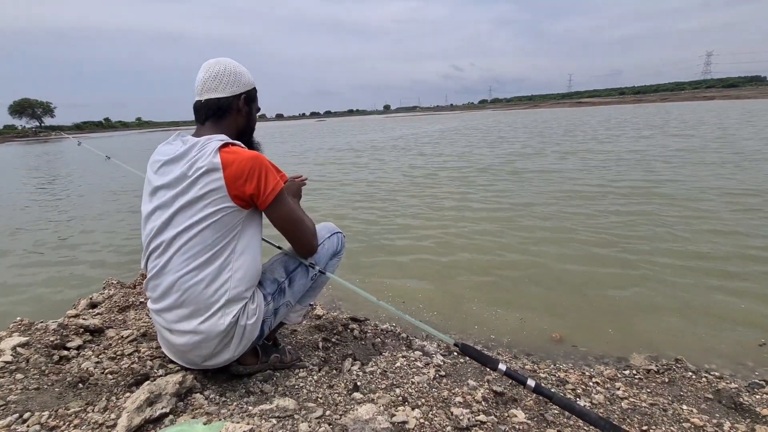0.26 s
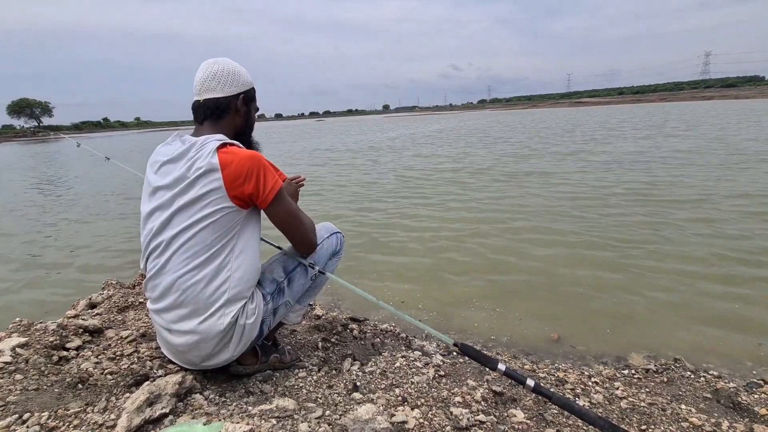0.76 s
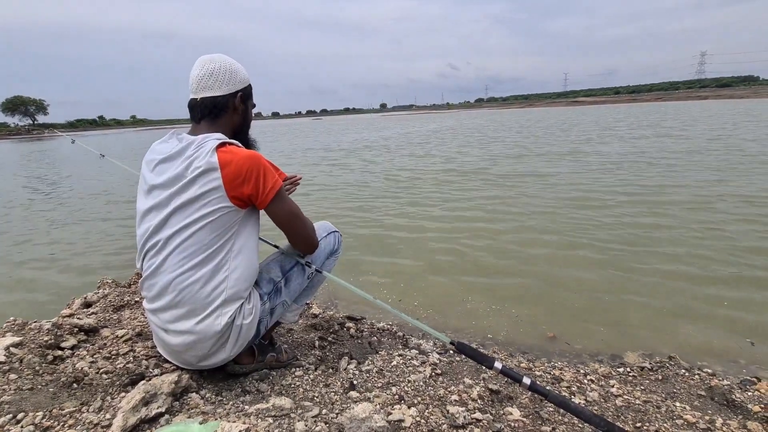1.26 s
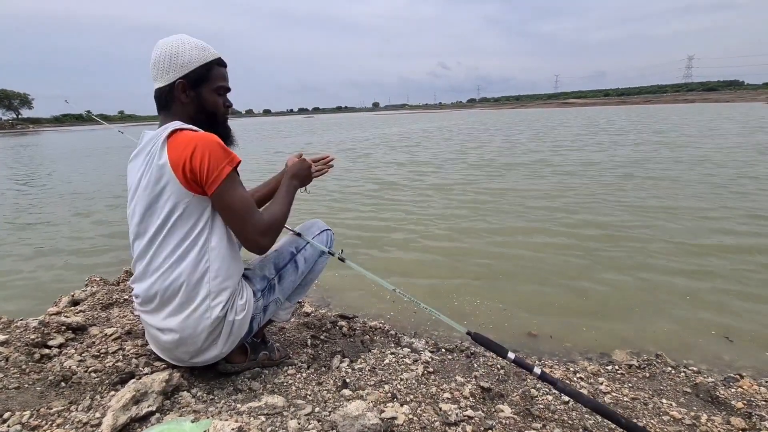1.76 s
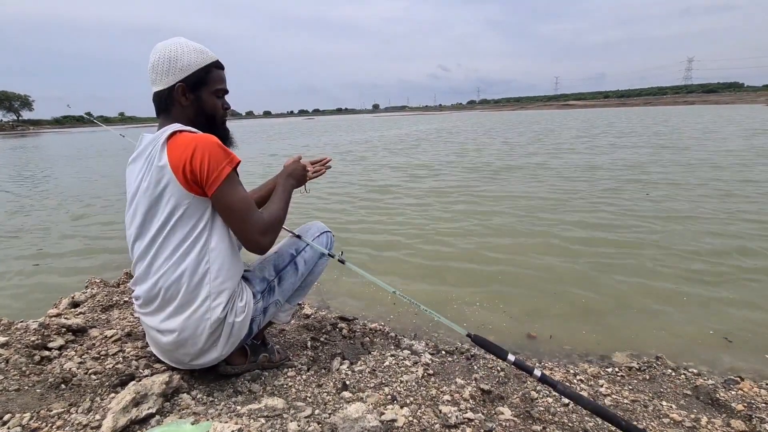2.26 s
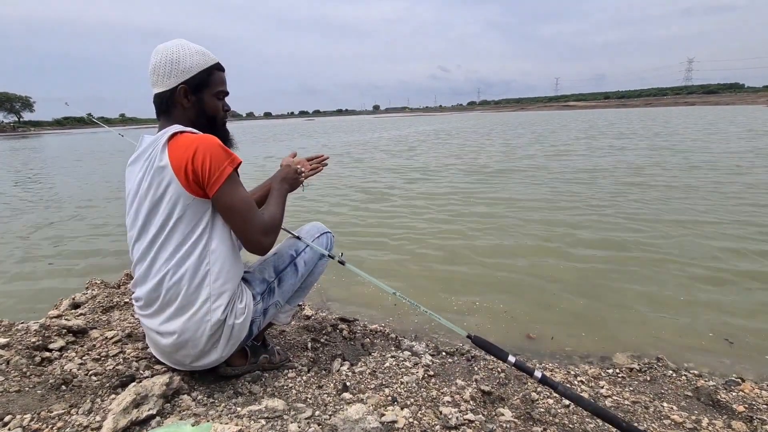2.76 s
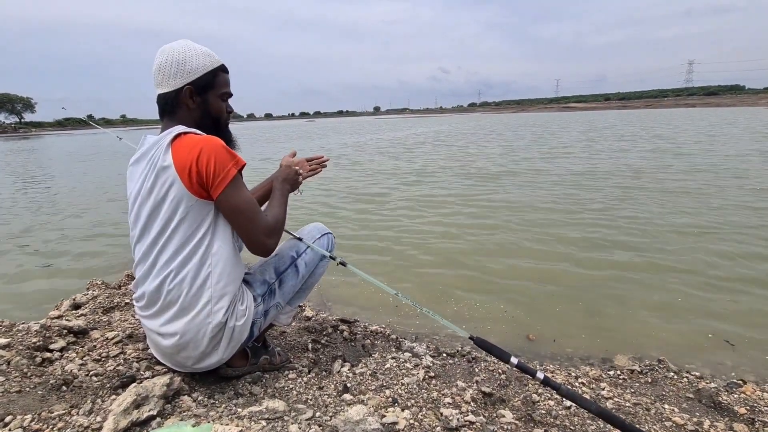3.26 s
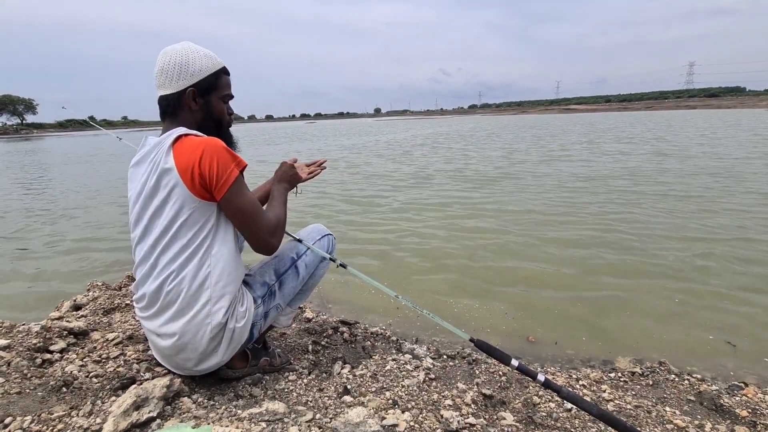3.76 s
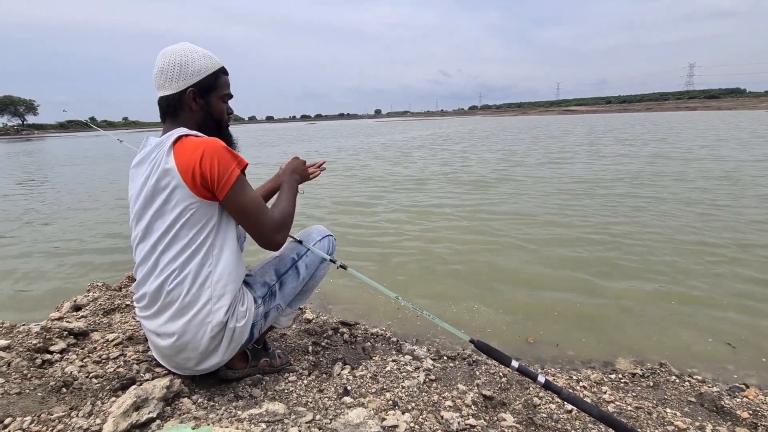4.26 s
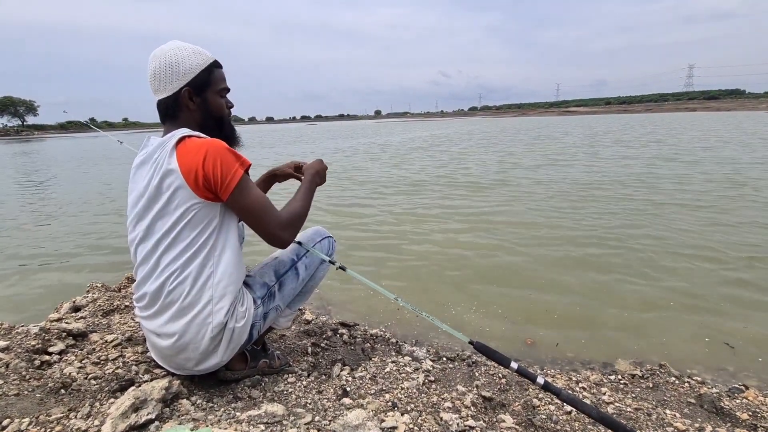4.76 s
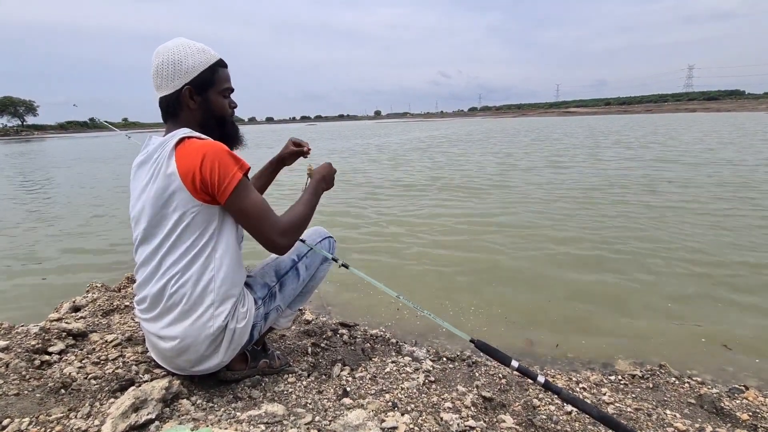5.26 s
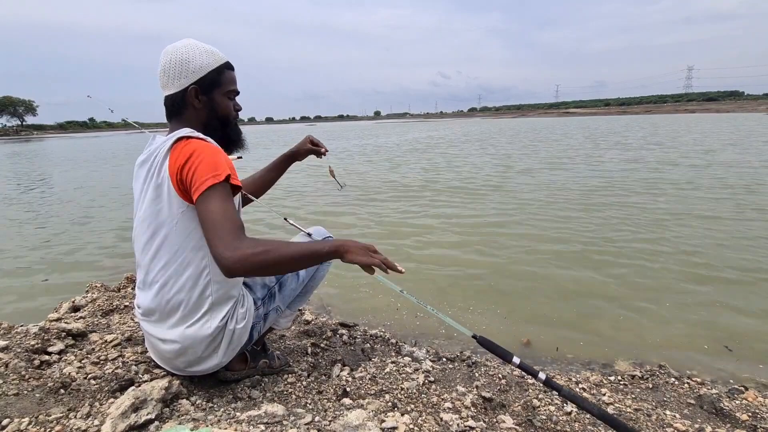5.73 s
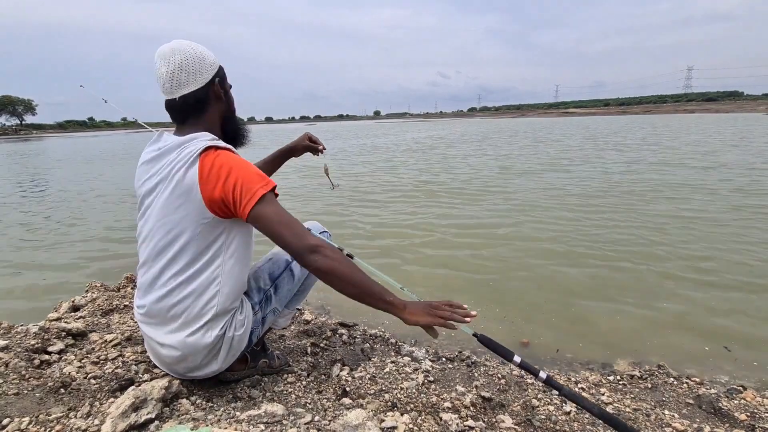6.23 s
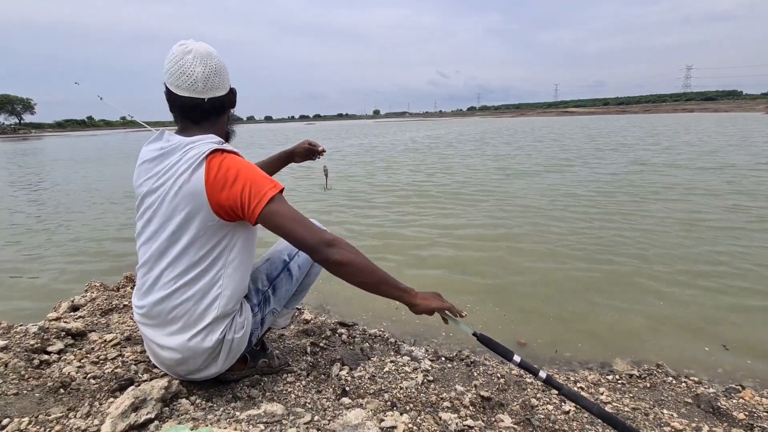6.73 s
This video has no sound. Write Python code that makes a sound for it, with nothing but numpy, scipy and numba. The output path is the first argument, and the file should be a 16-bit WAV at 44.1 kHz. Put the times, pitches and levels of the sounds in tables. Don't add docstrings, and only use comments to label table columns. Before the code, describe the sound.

Breezy waterside ambience with faint ticks and rustling hands, then a nearby crow caws three times, pauses, and caws three times more.

```python
import sys
import numpy as np
from scipy import signal
from scipy.fft import rfft, irfft, next_fast_len
from scipy.io import wavfile
from scipy.ndimage import uniform_filter1d
from numba import njit

SR = 44100
rng = np.random.default_rng(int(sys.argv[2]) if len(sys.argv) > 2 else 0)


def elevation(decibels):
    levels = np.asarray(decibels, float)
    return 10 ** (levels / 20)


def digitize_waveform(pressure):
    field = np.atleast_2d(pressure).T
    bounded = np.clip(field, -1, 1)
    quanta = np.round(bounded * 32767).astype(np.int16)
    wavfile.write(sys.argv[1], SR, quanta)


N = 308406

# (centre [s], length [s], rise [dB], shift of left minus right [dB])
GUSTS = [(0.088, 0.081, 6.5, -2), (0.243, 0.23, -4, -9), (0.477, 0.42, 1, 1), (1.594, 0.29, -5.5, -12),
         (1.85, 0.48, 3.5, 0.5), (2.347, 0.43, 7, -8.5), (2.594, 0.34, 10, 1.5), (2.805, 0.26, 13.5, -14.5),
         (3.07, 0.27, -4.5, 3), (3.647, 0.51, -5.5, -4), (3.922, 0.36, -4, -12), (4.255, 0.17, 5.5, -4),
         (4.778, 0.11, -5, -8), (.9, .2, 3, 3), (1.196, 0.14, 6, 2), (5.403, 0.13, 3, 0),
         (6.3, 0.38, 0.5, 1), (6.868, 0.27, 2, -3), (4.926, 0.22, 14, -11), (5.2, .12, -5, 0),
         (5.36, .15, -4, 0), (2.44, .15, 3, 0), (3.05, .12, 4, 0), (5.078, 0.2, 7.5, 0.5),
         (5.526, 0.77, 5.5, 2.5), (6.678, 0.049, -6, -4)]
# (frequency [Hz], density [dB per Hz])
RUMBLE_SPECTRUM = [(8.8, -45), (15, -6.5), (43, 3.5), (70, 5), (87, 1.5), (171, -18), (295, -32.5),
                   (373, -37), (500, -61), (650, -65), (1100, -120)]
# (frequency [Hz], density [dB per Hz])
AIR_SPECTRUM = [(210, -11), (350, -3), (400, -8), (800, -9.5), (1280, -8.5), (2290, -10.5), (4170, -13.5),
                (5280, -16.5), (7000, -22.5), (8700, -31), (10500, -25), (13000, -25), (15200, -29.5),
                (15650, -29)]
# (frequency [Hz], width [Hz], level [dB])
PUMP_BANDS = [(144, 80, -62.5), (240, 84, -68), (294.1, 34, -68.5), (572.4, 40, -77.5)]
# (start [s], length [s], grain level [dB])
HANDLING = [
    (.28, 1.4, -58.5),
    (1.85, 0.81, -47.5),
    (2.598, 1.1, -59),
    (5.5, 1.7, -52.5),
]
# (time [s], peak [dB], ring [Hz], ring width [Hz])
TICKS = [(0.12, -58, 2500, 2500), (0.1753, -61, 8600, 9700), (0.286, -59, 8000, 8000),
         (0.34, -50, 3000, 2500), (0.358, -62, 7400, 3000), (.4, -59, 6700, 3000), (0.45, -54, 3700, 2000),
         (0.475, -56, 5700, 9000), (0.6056, -43, 3700, 5400), (0.56, -53.5, 10300, 3950),
         (0.868, -44, 5900, 3500), (0.867, -60, 11000, 5000), (1.0677, -60, 6200, 1500),
         (1.0726, -72, 6000, 8000), (1.21, -52, 3000, 2000), (1.858, -45, 1300, 3500),
         (1.876, -51, 2900, 2000), (2.3151, -45.5, 3200, 1800), (2.3883, -43, 2800, 3500),
         (3.5, -67, 10600, 1985), (4.868, -53, 2700, 2700), (5.1413, -51, 3100, 2000),
         (5.257, -66, 10000, 6000), (5.9394, -59, 6200, 2993), (6.625, -54, 4300, 2000),
         (6.597, -62, 6400, 2500), (6.608, -60, 7000, 2500), (6.042, -60, 5500, 2500),
         (6.155, -61, 7800, 2500), (6.291, -65, 7500, 3500), (6.079, -56, 3800, 1200),
         (4.7, -56, 3100, 900), (6.4, -56, 3100, 900), (1.145, -59, 6500, 3000), (1.074, -57, 5300, 1500),
         (7.2, -55, 2700, 1500), (4.4, -57.5, 3850, 1000), (6.563, -61, 4400, 2000),
         (6.6533, -64, 10000, 7870), (6.666, -51, 8200, 14000)]
# (start [s], length [ms], level [dB])
SWISHES = [(.28, 120, -63), (.84, 58, -58), (1.05, 126, -69), (1.86, 210, -61), (2.24, 140, -62),
           (4.2, 81, -69), (5.42, 46, -67), (6.64, 40, -68)]
# (start [s], peak [dB], pitch [Hz],
# length [ms], glide [factor])
PEEPS = [(0.431, -57, 3560, 98, 1.24), (.512, -54, 7180, 26, 0.92), (0.53, -61, 5850, 74, 0.91),
         (.57, -57, 5000, 57, 0.68), (.755, -62, 4220, 32, 0.94), (1.225, -56, 3350, 35, 0.95),
         (1.31, -55.5, 4200, 18, 0.96), (1.34, -62, 5580, 32, 0.88), (1.872, -50, 4050, 30, 0.96),
         (2.955, -55.5, 4010, 81, 1.1), (3.005, -54.5, 4350, 50, 1.08), (3.335, -46.5, 5230, 36, 0.96),
         (3.05, -51, 5300, 32, 1.08), (2.765, -59, 3750, 22, 0.94), (3.775, -56, 3750, 18, 1.1),
         (3.39, -62.5, 5870, 78, 1), (3.439, -52, 4530, 31, 0.72), (3.615, -54.5, 3800, 47, 1.12),
         (3.65, -55, 4400, 39, 1), (3.69, -58, 7300, 30, 0.84), (3.72, -61, 5480, 63, 1.03),
         (3.76, -56, 4450, 24, 0.9), (5.716, -47, 4170, 12, .9), (5.872, -50, 4150, 14, .93),
         (5.89, -58, 4200, 52, 1), (5.46, -55, 4200, 14, 0.9)]
# (time [s], peak [dB])
TRILL = [(2.818, -50), (2.882, -48), (2.936, -51.5), (3.009, -41), (3.139, -43), (3.204, -42.5),
         (3.293, -46), (3.376, -49), (3.724, -57), (4.0906, -55), (4.445, -58)]
# (low turn [s], peak [dB], high start [dB], held note [Hz], its slope [Hz])
WHISTLES = [(0.841, -45.5, -7, 4205, -37), (0.977, -45, -8.5, 4260, -180), (1.122, -44, -8, 4210, -55),
            (1.909, -45.5, -21, 4264, -57), (2.048, -44, -4, 4250, -11), (2.1957, -43.5, -2.5, 4154, 5),
            (2.358, -46, -2.5, 4237, -14), (5.4012, -44, -8, 4250, 49), (5.533, -43.5, -5.5, 4300, 40),
            (5.672, -47, -2.5, 4230, -26), (5.825, -47.5, -7.5, 4180, 310)]
# (time from the onset of its low turn [ms], pitch [Hz], level [dB])
PLUNGE = [(-32, 6950, -30), (-25, 6800, -8), (-14, 6680, -6), (-11, 5500, -8), (-8, 4600, -5),
          (-3, 4130, -3), (7, 3640, -3), (9, 3600, -30), (10, 4600, -10)]
# (time [s], peak [dB], pitch [Hz], length [ms])
DRIPS = [(1.222, -52, 4720, 9), (1.834, -46, 3850, 5.9), (2.76, -49.5, 5390, 13), (3.444, -47, 1470, 15),
         (3.462, -48, 1433, 18), (3.807, -55, 410, 21), (4.015, -45.5, 3680, 4.7), (4.268, -58, 387, 16),
         (4.68, -50, 3680, 3.6), (5.191, -44, 3720, 11), (5.248, -51.5, 3920, 6.4), (5.635, -51, 600, 22),
         (6.372, -53, 630, 30), (6.52, -57, 3320, 15), (6.599, -47, 3280, 6.2)]
# (time [s], peak [dB], pitch [Hz], length [ms], glide [factor])
RISING_DRIP = (4.612, -56, 1330, 30, 1.7)
# (time [s], peak [dB], second chip after [ms])
CHIP_PAIRS = [(1.8064, -52.5, 21), (2.082, -52.5, 21), (2.841, -53.5, 19), (3.2853, -55, 18),
              (3.989, -53.5, 19), (4.651, -54, 18), (5.221, -53, 17), (6.051, -57, 19), (6.752, -43, 18)]
# (start [s], end [s])
CAWS = [
    (1.855, 2.128),
    (2.325, 2.805),
    (3.038, 3.34),
    (5.445, 5.89),
    (6.105, 6.49),
    (6.709, 6.99),
]
# (time [s], effort [dB], beak opening as brightness [dB], shrillness [dB])
EFFORT = [
    [(1.858, -44, 1, -5), (1.93, -44, 5, -10), (2.0, -42.5, 12.5, -16), (2.035, -43.5, 15.5, -12),
     (2.06, -43.5, 15, 6), (2.08, -43.5, 12.5, -8), (2.107, -46.5, 12, -8)],
    [(2.345, -54, -2, 0), (2.383, -44.5, 1, -11), (2.5, -41, 8, -5), (2.633, -42.5, 8.5, 7),
     (2.71, -44.5, 12, 4), (2.755, -50, 11.5, -3), (2.785, -56.5, 11, -3)],
    [(3.041, -57.5, 10, -9), (3.06, -48, 7.5, -2), (3.09, -42, 9, 2.5), (3.16, -38.5, 11.5, -12),
     (3.21, -40, 17.5, 5.5), (3.26, -42, 18.5, 5), (3.318, -45, 13.5, -6)],
    [(5.465, -61.5, -15, -4), (5.495, -54.5, -14, -4), (5.52, -45, -4, 1), (5.62, -40.5, 7.5, -6),
     (5.713, -45.5, 6, 8), (5.785, -45, -6.5, 15), (5.839, -45, 9.5, 12), (5.865, -54.5, 9, 6)],
    [(6.112, -55, -1, -12), (6.135, -48.5, 1, -10), (6.187, -42.5, 6.5, -7), (6.24, -46, -2, 11),
     (6.3, -47.5, -3, 17), (6.4, -47, -4, 18), (6.449, -45.5, -3, 10), (6.472, -53.5, 2, 4)],
    [(6.713, -57, 2, -10), (6.728, -52, 1, -4), (6.74, -44, 3.5, 0), (6.78, -42, 5, -11),
     (6.87, -45, -1, -5), (6.957, -47, -9, 6)],
]
# (time [s], pitch [Hz], rattle [0-1], every-second-pulse weakening [0-1])
VOICE = [
    [(1.855, 500, 1, 0), (1.93, 570, .9, 0), (1.99, 585, .65, 0), (2.02, 580, .5, 0), (2.05, 560, .25, .15),
     (2.075, 540, .2, .4), (2.105, 470, .4, .4), (2.112, 460, 1, .2), (2.13, 450, 1, .3)],
    [(2.325, 520, 1, 0), (2.4, 580, .9, 0), (2.52, 618, .8, 0), (2.6, 615, .75, 0), (2.68, 570, .6, 0),
     (2.7, 535, .25, .2), (2.72, 515, .2, .4), (2.75, 420, .4, .5), (2.76, 430, 1, .3), (2.81, 430, 1, .3)],
    [(3.03, 560, 1, 0), (3.1, 600, .95, 0), (3.15, 635, .8, 0), (3.195, 648, .35, 0), (3.228, 603, .15, 0),
     (3.26, 612, .2, .15), (3.285, 625, .25, .5), (3.318, 490, .45, .2), (3.34, 520, 1, .2)],
    [(5.445, 480, 1, 0), (5.52, 580, .9, 0), (5.6, 600, .7, 0), (5.725, 570, .65, 0), (5.74, 525, .15, 0),
     (5.78, 478, .1, .15), (5.835, 468, .1, 0), (5.86, 390, .35, 0), (5.89, 340, 1, 0)],
    [(6.105, 540, 1, 0), (6.19, 600, .8, 0), (6.27, 525, .78, .15), (6.4, 500, .7, .2),
     (6.42, 485, .25, .25), (6.448, 435, .35, .25), (6.46, 450, 1, 0), (6.49, 450, 1, 0)],
    [(6.705, 540, 1, 0), (6.78, 585, .85, 0), (6.86, 520, .85, 0), (6.93, 445, .8, .1), (6.99, 350, .9, 0)],
]
# (low [Hz], main [Hz], upper [Hz], top [Hz])
THROAT_HZ = (1057, 1367, 1739, 2750)
# (start [s], length [s], peak [dB], top band over it [dB])
FAR_CROW = [
    (4.047, 0.61, -56, -3),
    (4.854, 0.48, -58.5, -8),
]
# (frequency [Hz], gain [dB])
SHADE = [(100, 4.5), (700, 4.5), (1250, -10), (1800, -1.5), (2400, -11.5), (4200, -14.5), (6700, -3),
         (8100, -6.5), (15000, -30)]
# (frequency [Hz], lead [samples])
LEAD = [(500, 11.3), (1380, 19), (1640, 20.3), (16000, 25.66)]


def level(x, db):
    return x * elevation(db) / np.sqrt(np.mean(x ** 2))


def curves(*tables):
    t, rows = np.arange(N) / SR, np.vstack(tables)
    gate = sum((t >= table[0][0]) * (t <= table[-1][0]) for table in tables)
    tracks = [np.interp(t, rows[:, 0], column) for column in rows.T[1:]]
    return tracks, uniform_filter1d(1. * gate, size=120)


def colour(x, points):
    hz, db = np.transpose(points)
    size = next_fast_len(N)
    f = np.fft.rfftfreq(size, 1 / SR) + 1
    gain = elevation(np.interp(np.log(f), np.log(hz), db))
    return irfft(rfft(x, size) * gain, size)[..., :N]


@njit
def svf(x, hz, width):
    y, b, l, g, k = np.empty(len(x)), 0., 0., 0., 0.
    for i in range(len(x)):
        if i == 0 or hz[i] != hz[i - 1]:
            g, k = np.tan(np.pi * hz[i] / SR), width / hz[i]
        v = (b + g * (x[i] - l)) / (1 + g * (g + k))
        b, l, y[i] = 2 * v - b, l + 2 * g * v, k * v
    return y


def band(x, hz, width):
    hz = hz + np.zeros(N)
    y = svf(svf(x, hz, 1. * width), hz, 1. * width)
    return y / np.sqrt(uniform_filter1d(y ** 2, size=1800) + 1e-12)


def walk(rate):
    k = int(SR / rate)
    held = np.repeat(rng.standard_normal(N // k + 1), k)
    return 1.3 * uniform_filter1d(uniform_filter1d(held, k), k)[:N]


def add(out, s, piece):
    start = int(s * SR)
    out[start:start + len(piece)] += piece[:N - start]


def peep(hz0, hz1, ms):
    u = np.linspace(0, 1, int(ms * SR / 1000))
    return np.sin(np.pi * u) * np.sin(2 * np.pi * np.cumsum(hz0 + (hz1 - hz0) * u) / SR)


def gusts():
    db, pan_db = np.zeros((2, N))
    for s, long, peak_db, swing_db in GUSTS:
        arch = np.hanning(int(long * SR))
        add(db, max(s - long / 2, 0), peak_db * arch)
        add(pan_db, max(s - long / 2, 0), swing_db * arch)
    return db, pan_db


def wind():
    breeze_db, breeze_pan_db, buffet_db = -47.5, 8.5, 1.23
    gust_db, swing_db = gusts()
    pan_db = swing_db + breeze_pan_db
    rumble = colour(rng.standard_normal((2, N)), RUMBLE_SPECTRUM + [(900, -78.0)])
    rumble = rumble / np.sqrt(uniform_filter1d(rumble ** 2, size=12000))
    loud_db = gust_db + breeze_db + 2.5 + buffet_db * walk(10)
    return rumble * elevation(loud_db + np.array([pan_db, -pan_db]) / 2)


def distant_hiss():
    hiss = np.zeros((2, N))
    for hz in 250 * 2. ** np.arange(7):
        drift_db = 1.36 * walk(12) + 0.45 * walk(1.9)
        ports = [svf(noise, hz + np.zeros(N), hz) for noise in rng.standard_normal((2, N))]
        hiss += elevation(drift_db) * np.array(ports)
    hiss = level(colour(hiss, [(20, -65)] + AIR_SPECTRUM + [(15780, -120)]), -62.0)
    cawing = curves(*([(s, 0), (end, 0)] for s, end, *_ in CAWS))[1]
    lift_db = 0.054 * gusts()[0] + 4 * uniform_filter1d(cawing, size=9000)
    return hiss * elevation(lift_db + np.array([[-1.5], [1.5]]))


def pump():
    light_db, loaded_s = -1.5, 1.5
    lightness = np.clip(1.3 - 1.2 * (np.arange(N) / SR / loaded_s) ** 3, 0, 1)
    drone = np.zeros(N)
    for hz, width, db in PUMP_BANDS:
        drone += elevation(db + 3.1 * walk(12)) * band(rng.standard_normal(N), hz, width)
    return elevation(0.37 * gusts()[0] + light_db * lightness) * drone


def rustle(count=3500):
    out, busy = np.zeros(N), np.full(N, elevation(-81))
    for s, long, db in HANDLING:
        add(busy, s, elevation(db) * np.hanning(int(long * SR)) ** 0.31)
    for when, pitch, size, length in rng.random((count, 4)):
        hz = 1800 * 5 ** pitch ** 1.5
        grain_db = -6 - 2.2 * np.log(size) - 9 * pitch
        grain = peep(hz, 0.67 * hz, 0.73 + 3 * length ** 3)
        add(out, when * N / SR, busy[int(when * N)] * elevation(grain_db) * grain)
    return out


def ticks():
    out, t = np.zeros(N), np.arange(400) / SR
    for s, db, hz, width in TICKS:
        ring_hz = hz + 0. * t
        snap = rng.standard_normal(400) * np.exp(-t / 0.0028)
        snap = svf(svf(snap, ring_hz, 1. * width), ring_hz, 0.49 * width)
        add(out, s, elevation(db + 8.5) * snap / np.abs(snap).max())
    return out


def swishes():
    out, cloth = np.zeros(N), band(rng.standard_normal(N), 4500, 14000)
    for s, ms, db in SWISHES:
        add(out, s, elevation(db) * np.hanning(int(ms * SR / 1000)) ** .5)
    return out * cloth * elevation(2.3 * walk(79))


def far_birds():
    out = np.zeros(N)
    for s, db, hz, ms, glide in PEEPS:
        add(out, s, elevation(db) * peep(hz, hz * glide, ms))
    for s, db in TRILL:
        add(out, s - .002, elevation(db - 5.5) * peep(6700, 4630, 21))
    return out * (.5 + .8 * walk(450))


def songbird():
    held_ms, held_db = (13.9, 28.6, 48.2, 49), (-4.5, -1.5, -2, -25)
    arch_hz, droop_hz = 90, 60
    echo_ms, echo_db = 7, -10
    out, (ms, hz, db) = np.zeros(N), np.transpose(PLUNGE)
    ms, db = np.r_[ms, held_ms], np.r_[db, held_db]
    t = np.arange(ms[0], ms[-1], 1000 / SR)
    for s, peak_db, start_db, held_hz, slope_hz in WHISTLES:
        begin = held_hz - arch_hz - slope_hz / 2
        end = held_hz - arch_hz + slope_hz / 2
        pitch = np.interp(t, ms, [*hz, begin, held_hz, end, end - droop_hz])
        phase = 2 * np.pi * np.cumsum(uniform_filter1d(pitch, size=60)) / SR
        loud_db = peak_db + np.interp(t, ms, db) + start_db * np.clip(-t / 15, 0, 1)
        add(out, s + ms[0] / 1000, elevation(loud_db) * np.sin(phase))
    echo = elevation(echo_db) * np.roll(out, int(echo_ms * SR / 1000))
    return (out + echo) * elevation(7.5 + 2.4 * walk(130))


def drips():
    out = np.zeros(N)
    for s, db, hz, ms, glide in [(*drip, .98) for drip in DRIPS] + [RISING_DRIP]:
        add(out, s, elevation(db) * peep(hz, hz * glide, ms))
    return out * (1 + .15 * walk(250))


def chipping_bird():
    out, chip = np.zeros(N), peep(9220, 5500, 4.7)
    for s, db, gap_ms in CHIP_PAIRS:
        add(out, s - .001, elevation(db + 5.5) * chip)
        add(out, s - .001 + gap_ms / 1000, elevation(db + 5.5 - 1.3) * chip)
    return out * (1 + .15 * walk(250))


def syrinx(hz, rattle, weak):
    flap_hz = 58 + 34 * rattle
    flap = np.cumsum(flap_hz * (1 + .13 * walk(70))) / SR
    shut = (.5 + .5 * np.cos(2 * np.pi * flap)) ** 5
    sag = uniform_filter1d((flap % 1) ** 3 - .13, size=60) * np.clip(1 + .3 * walk(80), .3, 2)
    bend = 1 + rattle * (.02 * walk(400) - .3 * sag) + .007 * walk(160)
    phase = 2 * np.pi * np.cumsum(hz * bend) / SR
    pulses = sum(np.cos(k * phase) for k in range(1, 13))
    pulses = pulses * (1 + weak * np.cos(phase / 2))
    breath = (.6 + 1.5 * rattle ** 2) * (1 + .8 * np.cos(phase)) * rng.standard_normal(N)
    return (1 - .9 * rattle ** 3.2 * shut) * (pulses + breath), shut


def caw_effort(start, end, rows):
    first, last = rows[0], rows[-1]
    onset = (start, first[1] - 17.5, first[2] - 11.5, first[3])
    return [onset, *rows, (end, last[1] - 23, *last[2:])]


def crow():
    efforts = (caw_effort(*caw, rows) for caw, rows in zip(CAWS, EFFORT))
    (effort_db, up_db, shrill_db), gate = curves(*efforts)
    hz, rattle, weak = curves(*VOICE)[0]
    low_db = effort_db - 0.41 * up_db
    third_db = -20.5 + shrill_db + up_db
    voice, shut = syrinx(hz, rattle, weak)
    breath = rng.standard_normal(N)
    patchy = level(uniform_filter1d(uniform_filter1d(breath, size=500), size=500), 0)
    low_db = low_db + 2 * rattle * patchy
    up_db = up_db + 2 * rattle * (patchy[::-1] - patchy)
    drop = np.maximum(hz / 580, .8) ** 0.19
    hoarse, airy = voice + 2.0 * rattle * breath, voice + 3 * breath
    low_hz, main_hz, upper_hz, top_hz = THROAT_HZ
    throat = elevation(11.0) * band(hoarse, main_hz, 213)
    throat -= elevation(8.3 * weak - 8.0 - 8.0 * rattle ** 10) * band(voice, low_hz * drop, 420)
    throat -= elevation(up_db + 3.0) * band(voice, upper_hz * drop, 363)
    throat += elevation(third_db + 1.0) * band(hoarse, 4 * hz, 470)
    throat += elevation(up_db - 27.5) * band(rattle * voice + 3 * breath, top_hz, 550)
    throat += elevation(-31 + 6.0 * (1 - rattle)) * band(voice, hz, 200)
    top = elevation(-21.5) * band(airy, 4110, 500)
    top += elevation(-20.0) * band(airy, 5190, 400)
    top += elevation(-31.0) * band(breath, 9300, 9000)
    choke = 1 - .7 * rattle ** 8 * shut ** 0.53
    return gate * choke * elevation(low_db) * (throat + elevation(.5 * up_db) * top)


def far_crow():
    swells = [[(s, db - 7.5, top), (s + 0.74 * long, db, top), (s + long, db - 6.5, top)]
              for s, long, db, top in FAR_CROW]
    (db, top_db), gate = curves(*swells)
    voice = syrinx(500 + 45 * walk(7), 1.0, 0)[0] + 2.5 * rng.standard_normal(N)
    call = band(voice, 1490 + 60 * walk(6), 420)
    call += elevation(.5 * top_db - 1.5) * band(voice, 1930 + 50 * walk(6), 260)
    call += elevation(top_db) * band(voice, 2930, 1170)
    return gate * elevation(db) * call


def left_port(x):
    hz, lead = np.transpose(LEAD)
    size = next_fast_len(N)
    f = np.fft.rfftfreq(size, 1 / SR)
    advance = np.exp(2j * np.pi * f * np.interp(f, hz, lead) / SR)
    return irfft(rfft(colour(x, SHADE), size) * advance, size)[:N]


def banks(x):
    tail = rng.standard_normal((2, 12000)) * np.exp(-np.arange(12000) / SR / .04)
    tail[:, :600] = 0
    return elevation(-52.5) * signal.fftconvolve(x[None], tail, axes=1)[:, :N]


def scene():
    small = far_birds() + drips() + chipping_bird()
    birds = crow() + far_crow() + small + ticks() + rustle() + swishes()
    song = songbird()
    near = np.array([left_port(birds + elevation(-2.5) * song), birds + song])
    scattered = banks(birds + elevation(11) * small + elevation(5.5) * song)
    return near + scattered + wind() + distant_hiss() + pump()


def roll_off(x):
    return signal.sosfilt(signal.butter(12, 15450, fs=SR, output="sos"), x)


def record(dry):
    return roll_off(dry)


dry = scene()
out = record(dry)
digitize_waveform(out)
```